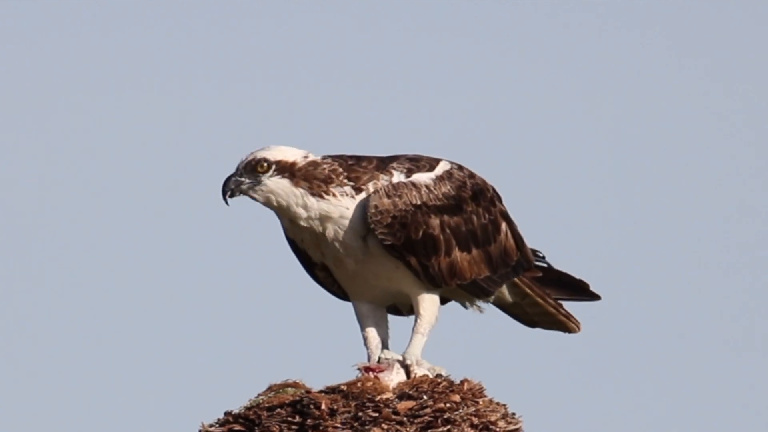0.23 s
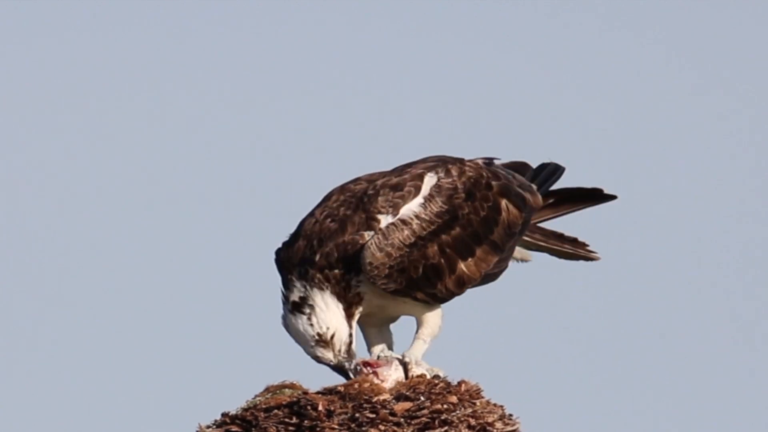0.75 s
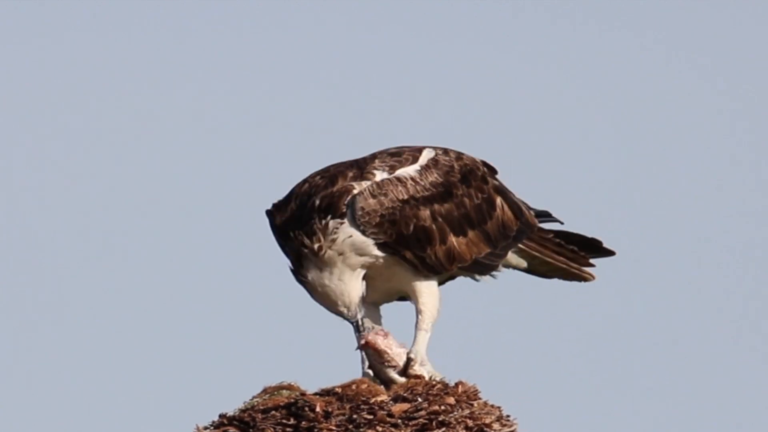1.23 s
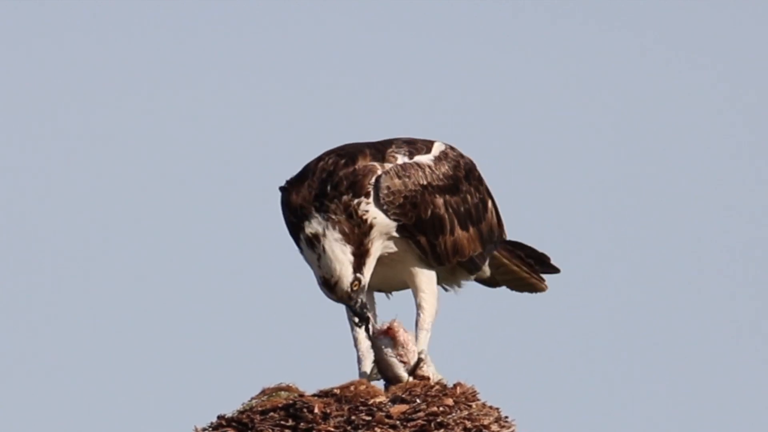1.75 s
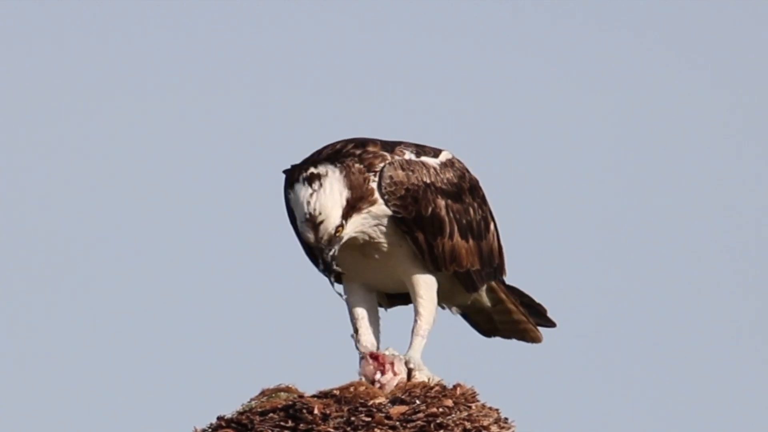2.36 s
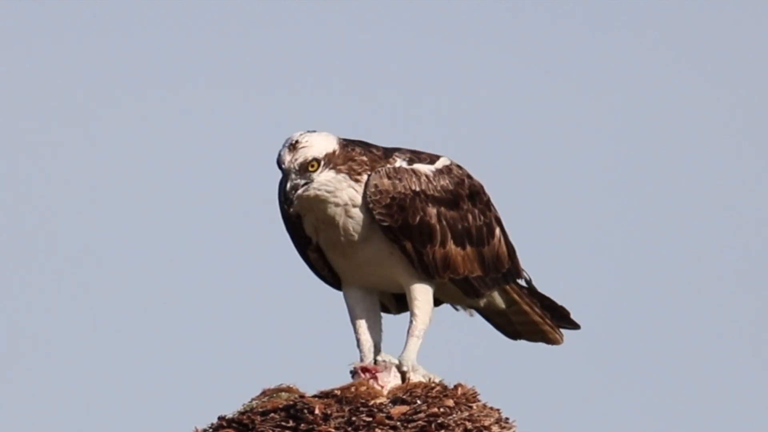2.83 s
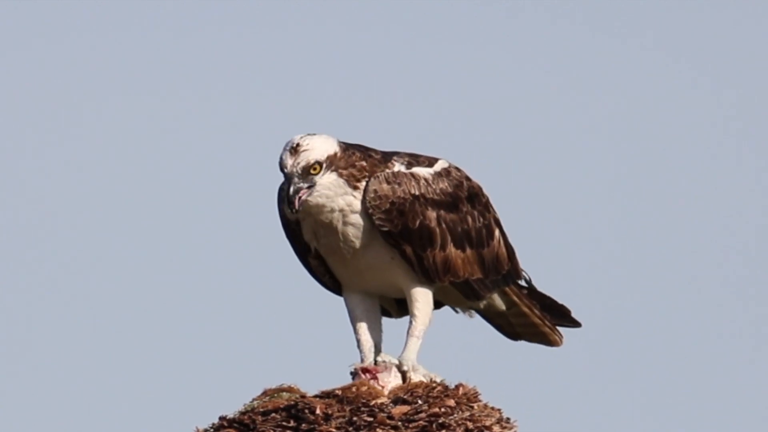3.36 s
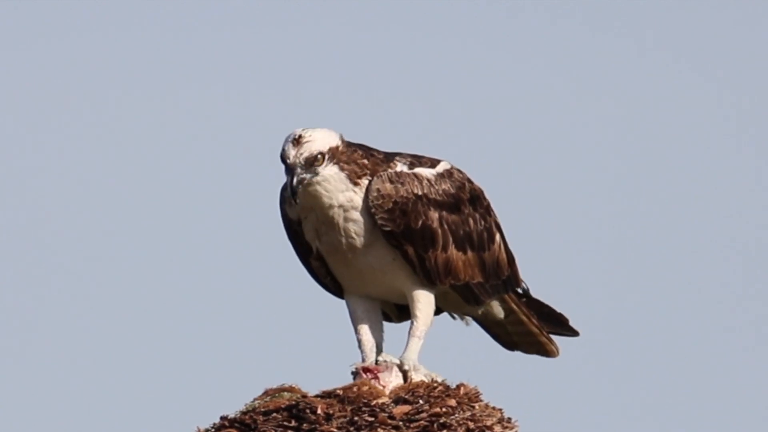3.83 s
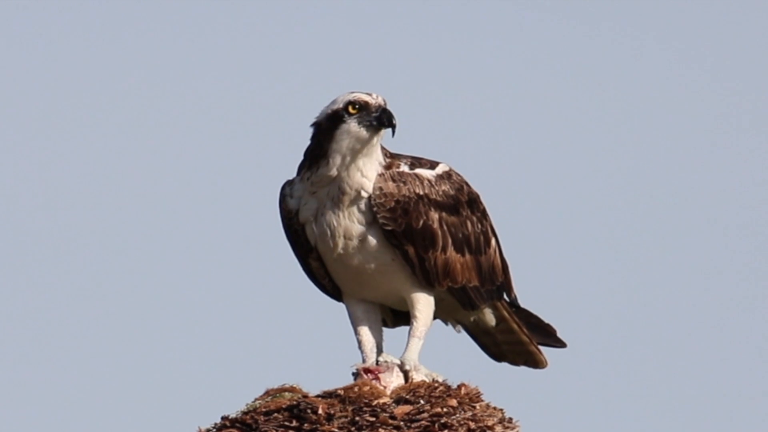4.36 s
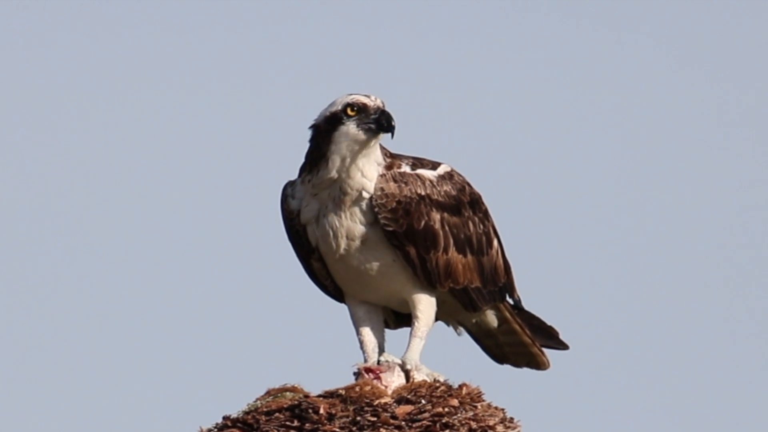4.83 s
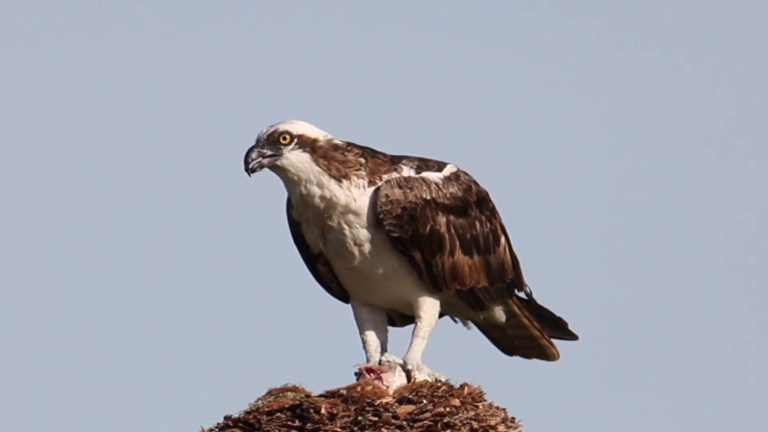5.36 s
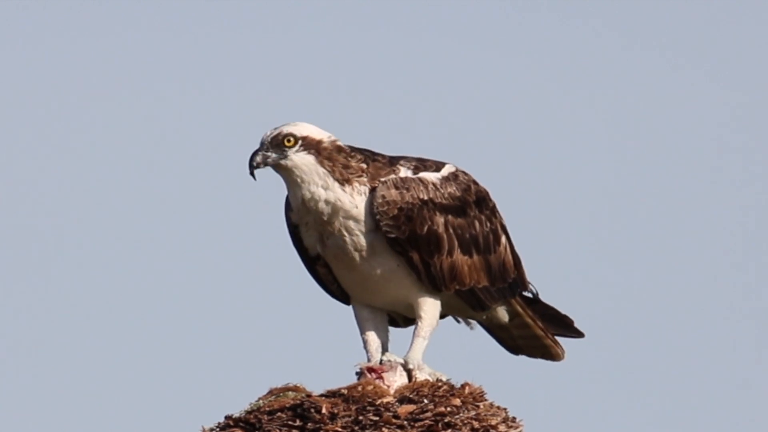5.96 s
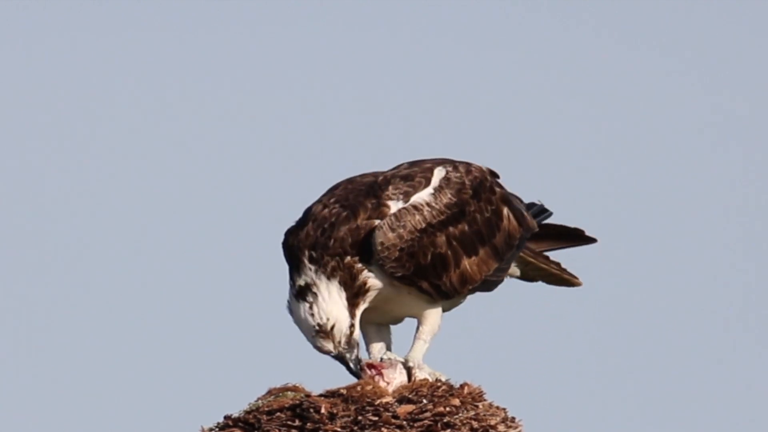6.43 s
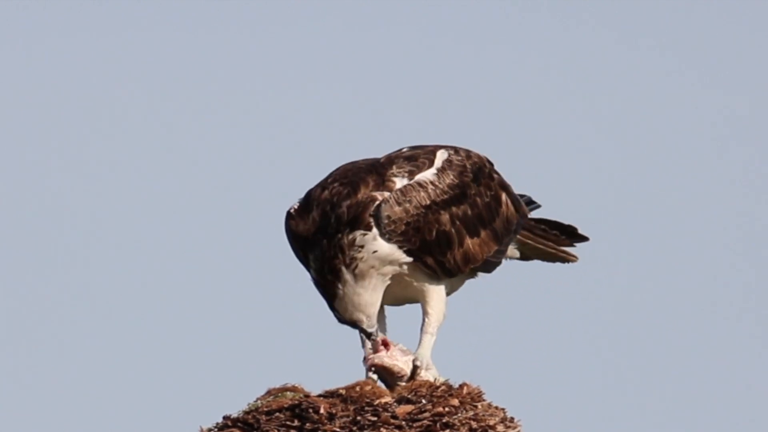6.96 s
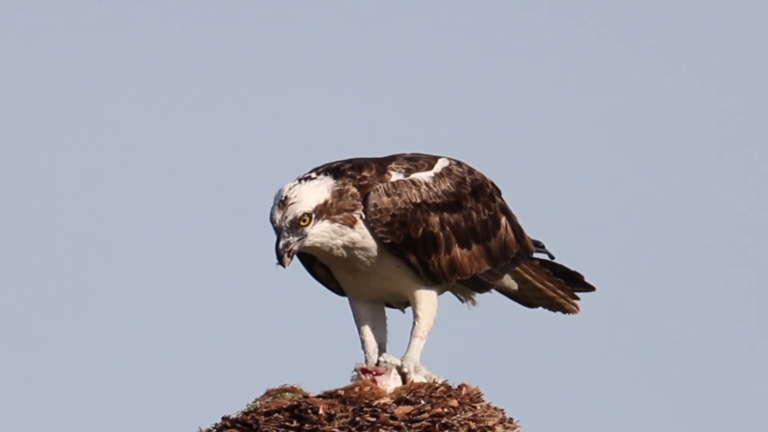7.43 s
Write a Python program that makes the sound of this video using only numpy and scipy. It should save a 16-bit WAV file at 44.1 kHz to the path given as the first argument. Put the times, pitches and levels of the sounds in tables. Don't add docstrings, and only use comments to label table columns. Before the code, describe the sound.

An osprey gives four short, falling whistles outdoors, with soft chips from a small bird, faint crickets, distant traffic drone and steady hiss.

```python
import sys
import numpy as np
from scipy import signal
from scipy.fft import rfft, irfft, next_fast_len
from scipy.io import wavfile
from scipy.ndimage import uniform_filter1d

SR = 44100
rng = np.random.default_rng(int(sys.argv[2]) if len(sys.argv) > 2 else 0)


def transcribe(u):
    v = np.clip(np.atleast_2d(u).T, -1, 1)
    q = np.round(v * 32767).astype(np.int16)
    wavfile.write(sys.argv[1], SR, q)


def ratio_of_db(decibels):
    return 10 ** (np.asarray(decibels, float) / 20)


N = 339129
LEAD = SR // 2
TIME = np.arange(-LEAD, N) / SR

# (time [s], starting pitch [Hz], sag [Hz/s], knee after the start [s], fall past the knee [Hz/s])
WHISTLES = [
    (0.949, 2870, 6200, .05, 8400),
    (2.1, 2805, 4900, .049, 9600),
    (3.309, 2795, 4200, .058, 11800),
    (4.817, 2735, 3900, .036, 8400),
]
# (peak towards microphone [dB], level towards trees [dB], high overtones [dB])
FACING = [
    (-15, 4.5, -6),
    (-14.2, 3.5, -8),
    (-12, 1.5, 3),
    (-11.6, 1.2, 4),
    (-11, -.5, 3),
]
# (multiple of the pitch [1], level at full breath [dB], growth with breath [exponent])
OVERTONES = [(2, -16.5, .1), (3, -40, .3), (4, -40, .3), (5, -53, .5)]
# (starts dying [Hz], silent [Hz])
DYING_HZ = (2270, 2120)
FIRST_OFFSET_S = -1.09
HOOK_HZ, HOOK_S, KNEE_WIDTH_S = 150, .003, .003
FLOOR_HZ, LEVELLING_HZ = 2185, 40
FULL_BREATH_DB, SWELL_DB, SWELL_S, FADE_DB_PER_S = -13, 7, .032, 135
ECHO_S, ECHO_GAIN, ECHO_TOP_HZ = .004858, .95, 2760
LATE_ECHO_S, LATE_ECHO_DB = .017, -14

# (first return [s], build-up [s], quick t60 [s], slow t60 [s], slow part [dB], level [dB])
FAR_TREES = (.014, .025, .26, .95, -9, -14)
NEAR_FOLIAGE = (.008, .015, .12, .35, -15, -10.5)
NEAR_BUSHES = (.001, .002, .065, .48, -11.5, -3)

# (time [s], starting pitch [Hz], peak [dB], overtone [dB], bushes [dB])
CHIPS = [
    (1.9545, 5450, -24, -17, 4),
    (3.338, 5400, -24, -15, 2),
    (6.3148, 5550, -20.5, -11, -2),
]
CHIP_S, CHIP_TOP_HZ = .0155, 7280

# (wing pitch [Hz], peak [dB], strokes a chirp [count], usual spacing of chirps [s])
CRICKETS = [(7960, -47, 5, .186), (7640, -54, 6, .2), (8230, -51, 5, .19), (8800, -57, 6, .25),
            (6960, -57, 6, .21)]
CRICKET_TRIM_DB = [-.6, -1.2, -.8, -.6, -.6]
# (first chirp [s], last chirp [s])
BOUTS = [
    [(.149, 1.259), (1.49, 1.884), (2.046, 2.046), (2.262, 3.401), (3.631, 4.522), (4.718, 5.674),
     (5.826, 6.165), (6.452, 7.357), (7.516, 7.516)],
    [(.011, .804), (1.212, 2.646), (2.808, 3.94), (4.265, 4.812), (5.179, 5.767), (5.927, 6.55),
     (6.743, 6.928), (7.169, 7.569)],
    [(3.377, 3.574), (4.142, 4.296), (4.503, 5.244), (5.405, 6.143), (6.5, 7.128), (7.301, 7.489)],
    [(2.314, 2.314), (2.847, 3.606), (3.895, 5.855), (6.167, 6.412), (6.814, 7.082)],
    [(.797, 1.001), (2.728, 2.918), (4.307, 4.307), (5.228, 5.675), (6.997, 7.24)],
]
# (lowest pitch [Hz], highest pitch [Hz], level [dB], spread [dB])
CHORUS = (6200, 8900, -63, 2.5)
STROKE_S, STROKE_RING_S, STROKE_SAG = .008, .0056, .035

# (time [s], centre [Hz], width [Hz], level [dB], decay [s])
TICK = (5.526, 1600, 2000, -37, .004)

# (frequency [Hz], level [dB per Hz])
TRAFFIC = [(40, -74), (60, -67.5), (120, -69), (200, -77.5), (320, -82.5), (550, -79.5), (900, -79),
           (1600, -81.7), (3400, -83.3), (4100, -89.5), (6000, -90.5), (8000, -93), (10000, -98),
           (16000, -108)]
# (time [s], width [s], low edge [Hz], high edge [Hz], level [dB])
SWELLS = [
    (4.25, .7, 130, 260, 3.5),
    (1.9, 1.4, 830, 910, 4.5),
    (3.2, .8, 1200, 6000, 1.1),
]
TRAFFIC_FADE_DB_PER_S = .35
# (frequency [Hz], level [dB])
HUM = [(61, -54), (192, -64)]
# (time [s], peak [dB], width [s])
GUSTS = [
    (0.0, -45, .14),
    (.55, -55, .15),
    (4.95, -59, .3),
    (5.97, -59, .15),
    (6.75, -57, .22),
    (7.42, -55, .1),
]
CALM_DB = -65
# (frequency [Hz], level [dB per Hz])
HISS = [(15, -99), (100, -94.5), (400, -97), (1500, -99.6), (6000, -100), (12000, -100.5), (16000, -102)]


def osprey():
    hz = np.arange(SR // 2 + 1)

    def late(seconds):
        return np.exp(-2j * np.pi * hz * seconds)

    echo = ECHO_GAIN * late(ECHO_S) + ratio_of_db(LATE_ECHO_DB) * late(LATE_ECHO_S)
    echo = echo / (1 + (hz / ECHO_TOP_HZ) ** 28)
    calls = [(WHISTLES[0][0] + FIRST_OFFSET_S, *WHISTLES[-1][1:])] + WHISTLES
    out = np.zeros(len(TIME))
    for (s, *glide), (peak_db, trees_db, bright_db) in zip(calls, FACING):
        call = whistle(*glide, peak_db, bright_db)
        near = irfft(rfft(call) * (1 + echo), SR)
        overtones = band(band(call, 4000, 12000), 4000, 12000)
        trees = scatter(band(call, 2250, 3300), *FAR_TREES) + scatter(overtones, *NEAR_FOLIAGE)
        flutter = ratio_of_db(trees_db + .8 * walk(120, size=SR))
        i = int(s * SR) + LEAD
        out[i:i + SR] += near + flutter * trees
    return out[LEAD:]


def whistle(start_hz, sag_hz, knee, fall_hz, peak_db, bright_db):
    t = np.arange(SR // 5) / SR
    past_knee = KNEE_WIDTH_S * np.logaddexp(0, (t - knee) / KNEE_WIDTH_S)
    glide = start_hz + HOOK_HZ * np.exp(-t / HOOK_S) - sag_hz * t - (fall_hz - sag_hz) * past_knee
    dying_hz, silent_hz = DYING_HZ
    sounding = glide > silent_hz
    t, glide = t[sounding], glide[sounding]
    pitch = FLOOR_HZ + LEVELLING_HZ * np.logaddexp(0, (glide - FLOOR_HZ) / LEVELLING_HZ)
    phase = 2 * np.pi * np.cumsum(pitch) / SR

    db = peak_db - np.maximum(SWELL_DB * (1 - t / SWELL_S), FADE_DB_PER_S * (t - SWELL_S))
    onset = np.clip(t / .004, 0, 1) ** .7
    ending = np.clip((glide - silent_hz) / (dying_hz - silent_hz), 0, 1)
    breath = ratio_of_db(uniform_filter1d(db, size=400)) * onset * ending
    effort = breath / ratio_of_db(FULL_BREATH_DB)
    opening = np.abs(np.sin(np.pi * (t / t[-1]) ** 1.2)) ** .5
    tone = np.sin(phase)
    for k, over_db, growth in OVERTONES:
        level = ratio_of_db(over_db + bright_db * (k > 2)) * effort ** growth * opening ** (k - 1.6)
        tone = tone + level * np.sin(k * phase)
    out = np.zeros(SR)
    out[:len(t)] = breath * tone
    return out


def small_bird():
    out = np.zeros(N)
    for s, start_hz, db, over_db, bushes_db in CHIPS:
        u = np.arange(int(CHIP_S * SR)) / (CHIP_S * SR)
        rise = np.sin(np.pi / 2 * np.minimum(u / .8, 1))
        phase = 2 * np.pi * np.cumsum(start_hz + (CHIP_TOP_HZ - start_hz) * rise) / SR
        tone = np.sin(phase) + ratio_of_db(over_db - 13 * u) * np.sin(2 * phase)
        chip = np.zeros(SR)
        chip[:len(u)] = ratio_of_db(db) * np.sin(np.pi * u ** .7) ** .8 * tone
        heard = chip + ratio_of_db(bushes_db) * scatter(chip, *NEAR_BUSHES)
        i = int(s * SR)
        out[i:i + SR] += heard[:N - i]
    return out


def crickets():
    every = far_chirps() + near_chirps()
    chance = rng.standard_normal((len(every), 8, 3))
    out = np.zeros(N + SR)
    u = np.arange(int(STROKE_RING_S * SR)) / (STROKE_RING_S * SR)
    ring = np.sin(np.pi * u) ** .6
    for (s, hz, db, strokes), rows in zip(every, chance):
        for k, (size, pitch, turn) in enumerate(rows[:int(round(strokes)) + 1]):
            stroke_hz = hz * (1 + .006 * pitch + STROKE_SAG * (.38 - u))
            phase = 2 * np.pi * np.cumsum(stroke_hz) / SR
            level = ratio_of_db(db + 4.0 - 8 * (k == 0) + 1.5 * size)
            i = int((s + (k - 1) * STROKE_S) * SR)
            out[i:i + len(u)] += level * ring * np.sin(phase + 9 * turn)
    grass = scatter(out, .003, .004, .06, .3, -10, -9)
    return (out + grass)[:N]


def near_chirps():
    rows = []
    for (hz, db, strokes, gap), trim_db, bouts in zip(CRICKETS, CRICKET_TRIM_DB, BOUTS):
        for first, last in bouts:
            times = np.linspace(first, last, round((last - first) / gap) + 1)
            rows += [(s, hz, db + trim_db, strokes) for s in times]
    chance = rng.standard_normal((len(rows), 2))
    return [(s, hz * (1 + .004 * a), db + .9 * b, strokes)
            for (s, hz, db, strokes), (a, b) in zip(rows, chance)]


def far_chirps():
    lo_hz, hi_hz, far_db, spread_db = CHORUS
    return [(.01 + a * N / SR, lo_hz + (hi_hz - lo_hz) * b ** 1.5, far_db + spread_db * (2 * c - 1), 5)
            for a, b, c in rng.random((160, 3))]


def twig():
    s, hz, width, db, decay = TICK
    t = TIME[LEAD:] - s
    snap = rng.standard_normal(N) * (t > 0) * np.exp(-np.abs(t) / decay)
    return band(snap, hz - width / 2, hz + width / 2) * ratio_of_db(db + 9)


def air_puffs():
    t = TIME[LEAD:]
    air = band(rng.standard_normal(N), 12, 42)
    puffs = ratio_of_db(CALM_DB + 2.1 * walk(3))
    for s, db, width in GUSTS:
        puffs = puffs + ratio_of_db(db) * np.exp(-((t - s) / width) ** 2)
    return air / air.std() * puffs * ratio_of_db(3.0)


def traffic():
    t = TIME[LEAD:]
    road = shaped(TRAFFIC)
    fade = ratio_of_db(-TRAFFIC_FADE_DB_PER_S * (t - t.mean()))
    road = road + band(road, 300, 2600) * (fade - 1)
    swells = np.zeros(N)
    for s, width, lo_hz, hi_hz, db in SWELLS:
        gain = ratio_of_db(db * np.exp(-((t - s) / width) ** 2))
        swells += band(road, lo_hz, hi_hz) * (gain - 1)
    return (road + swells) * ratio_of_db(.4 * walk(3))


def machinery():
    out = np.zeros(N)
    for hz, db in HUM:
        phase = 2 * np.pi * np.cumsum(hz * (1 + .02 * walk(2))) / SR
        out += ratio_of_db(db + 2.5 * walk(3)) * np.sin(phase)
    return out


def scatter(x, first, build, quick, slow, slow_db, level_db):
    t = np.maximum(np.arange(SR) / SR - first, 0)
    fall = ratio_of_db(-60 * t / quick) + ratio_of_db(slow_db - 60 * t / slow)
    tail = rng.standard_normal(SR) * fall * (1 - np.exp(-t / build))
    tail = tail / np.sqrt(np.sum(tail ** 2))
    return ratio_of_db(level_db) * signal.fftconvolve(x, tail)[:len(x)]


def shaped(table):
    size = next_fast_len(N)
    hz = np.arange(size // 2 + 1) * SR / size + 1e-3
    table_hz, table_db = np.transpose(table)
    gain = ratio_of_db(np.interp(np.log(hz), np.log(table_hz), table_db)) * np.sqrt(SR / 2)
    return irfft(rfft(rng.standard_normal(size)) * gain, size)[:N]


def band(x, lo_hz, hi_hz):
    return signal.sosfilt(signal.butter(2, [lo_hz, hi_hz], "bandpass", fs=SR, output="sos"), x)


def walk(rate, size=N):
    k = int(SR / rate)
    steps = np.repeat(rng.standard_normal(size // k + 1), k)
    return 1.3 * uniform_filter1d(uniform_filter1d(steps, k), k)[:size]


def scene():
    heard = osprey() + small_bird() + crickets() + twig() + air_puffs() + traffic() + machinery()
    return np.array([heard, np.zeros(N)])


def low_pass(x):
    return signal.sosfilt(signal.butter(12, 15930, fs=SR, output="sos"), x)


def record(dry):
    shared = band(shaped(HISS), 9000, 17000) * ratio_of_db(-5)
    hiss = np.array([shaped(HISS), shaped(HISS)]) + shared
    top_cut = signal.ellip(12, .1, 90, 15830, fs=SR, output="sos")
    mix = signal.sosfilt(top_cut, dry + hiss)
    return low_pass(mix)


dry = scene()
out = record(dry)
transcribe(out)
```